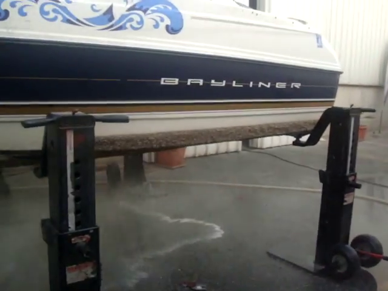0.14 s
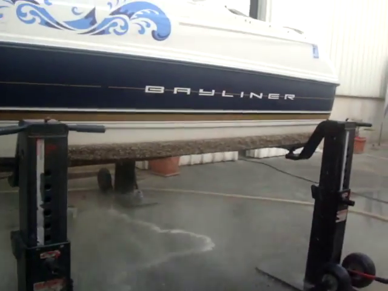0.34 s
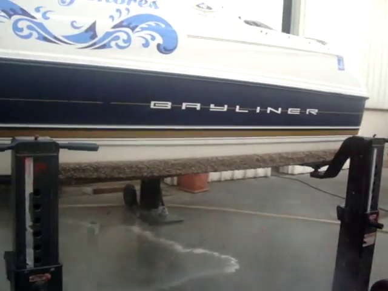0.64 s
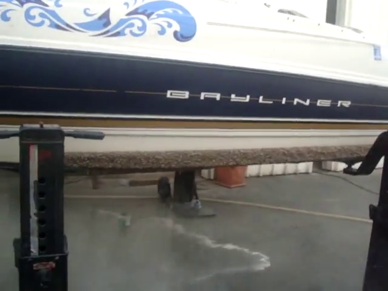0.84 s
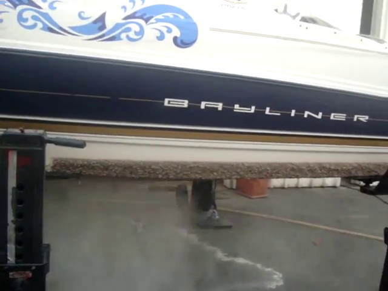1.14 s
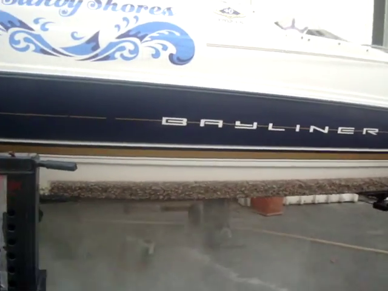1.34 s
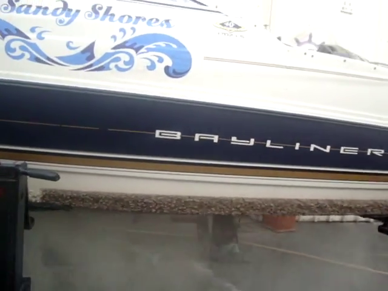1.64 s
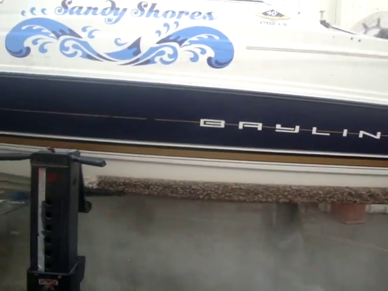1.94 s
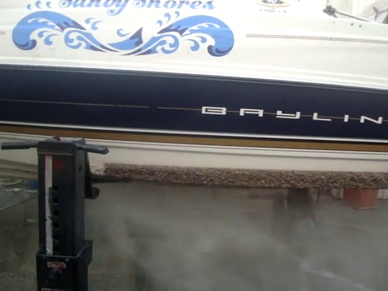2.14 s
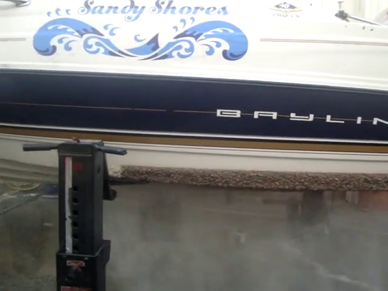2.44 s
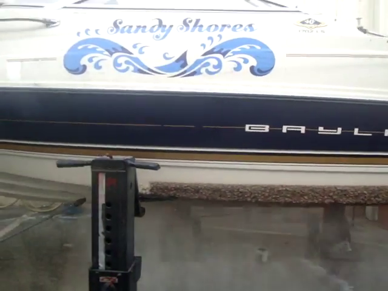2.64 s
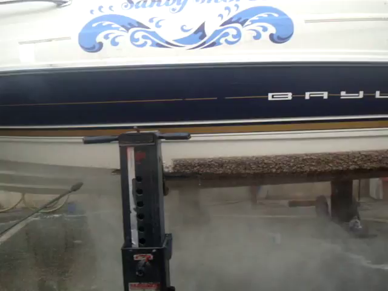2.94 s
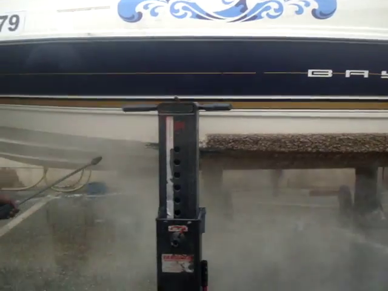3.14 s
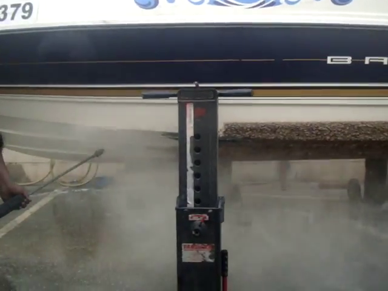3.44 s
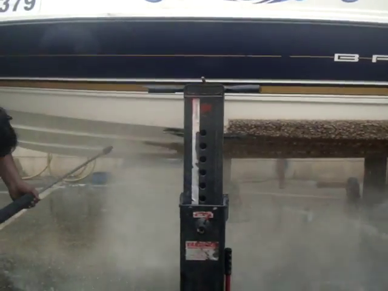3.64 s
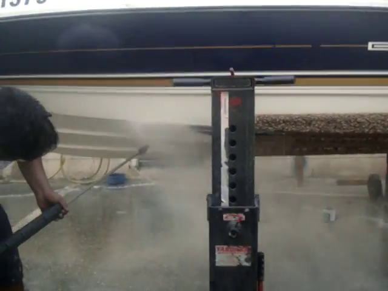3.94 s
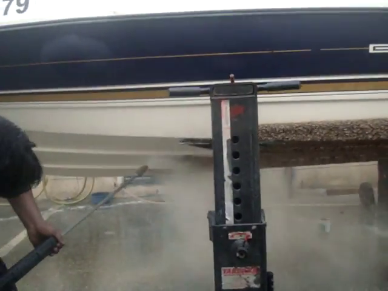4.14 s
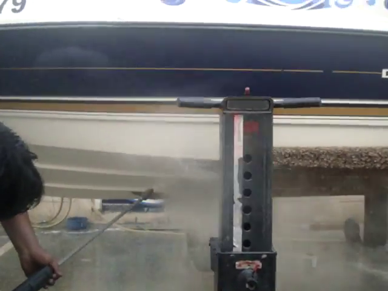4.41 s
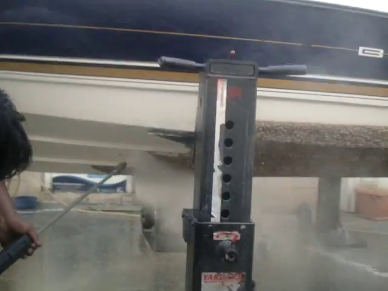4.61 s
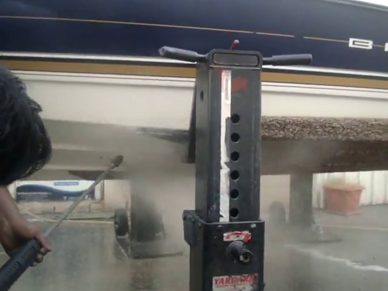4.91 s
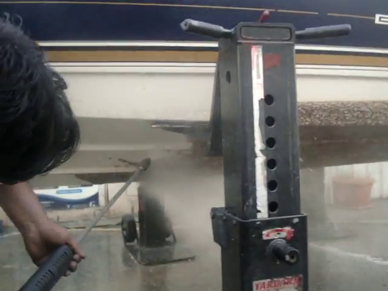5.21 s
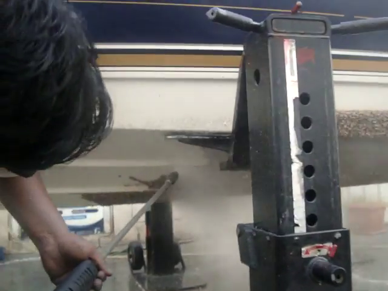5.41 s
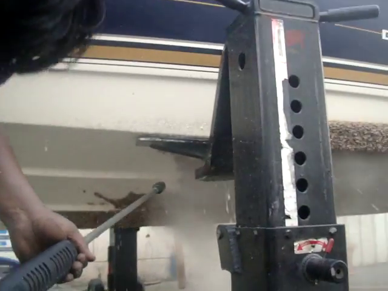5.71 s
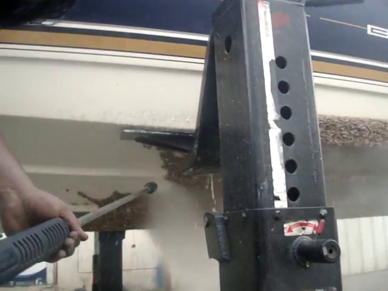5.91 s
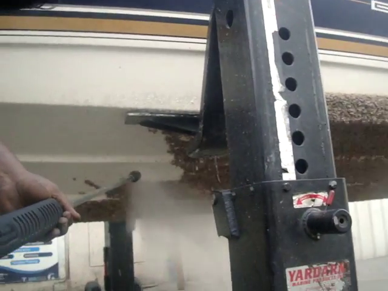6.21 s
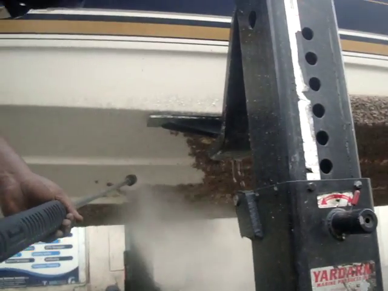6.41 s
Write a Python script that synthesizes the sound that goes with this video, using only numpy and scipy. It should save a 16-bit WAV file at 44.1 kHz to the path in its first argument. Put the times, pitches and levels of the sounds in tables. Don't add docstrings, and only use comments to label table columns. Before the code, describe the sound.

Close, bass-light spray roars on a boat's underside with a raspy motor-like drone, swelling early, later rougher and hollower before thinning at the end.

```python
import sys
import numpy as np
from scipy import signal
from scipy.fft import rfft, irfft, next_fast_len
from scipy.io import wavfile
from scipy.ndimage import uniform_filter1d, map_coordinates

SR = 44100
rng = np.random.default_rng(int(sys.argv[2]) if len(sys.argv) > 2 else 0)


def how_loud(loudness_db):
    steps = np.asarray(loudness_db, float) / 20
    return 10 ** steps


def dump(signal):
    limited = np.clip(np.atleast_2d(signal).T, -1, 1)
    pcm = np.round(limited * 32767).astype(np.int16)
    wavfile.write(sys.argv[1], SR, pcm)


N = 289296

# (time [s], spin rate [Hz])
SPIN_RATE = [(0.0, 162.6), (0.38, 167.4), (0.58, 164.7), (1.99, 165.3), (2.03, 163.6), (2.7, 165.6),
             (2.79, 162.1), (3.65, 162.5), (3.84, 164.6), (3.91, 159.7), (3.96, 162.8), (4.26, 160.1),
             (4.38, 162.8), (5.48, 161.7), (5.97, 164.2), (6.19, 161.8), (6.52, 164.3), (6.56, 166)]
# (time [s], drumming level [dB], ring against roar [dB])
DRUMMING = [(0, -25.5, -4.5), (.4, -27, -14), (.55, -32.5, -3.5), (.85, -33, -6), (1.1, -29.5, -3),
            (1.3, -28.5, -6), (1.7, -19, -4.5), (1.95, -20.5, -6), (2.35, -17.5, -10.5), (2.65, -19.5, -7),
            (2.95, -31, -1.5), (3.5, -27, -4), (3.9, -24.5, -7.5), (4.7, -34, -4), (5, -29, -3),
            (5.2, -33.5, -3), (6.22, -34.5, -8), (6.45, -28.5, -6.5)]
# (multiple of spin [1], level [dB], flutter [dB], phase smear [rad])
HULL_RING = [(1, -32.5, .9, .36), (2, -13, 1.8, .4), (3, -13, 2.2, .4), (4, -9.5, 2, .3),
             (5, -10.5, 1.2, .35), (6, -11, 1.8, .4), (7, -8, 1.6, .45)]
# (multiple of spin [1], level [dB])
HULL_BUZZ = [(8, -5), (9, -7), (10, -7), (11, -7), (12, -6), (13, -7.5), (14, -7.5), (15, -8), (16, -8),
             (17, -9), (18, -7), (19, -10), (20, -11), (22, -12), (24, -13)]
# (middle [s], length [s], multiple of spin [1], level [dB])
HULL_RESONANCES = [(0.063, 0.093, 3, -38.5), (0.34, 0.41, 2, -41.5), (0.303, 0.28, 4, -65), (1.13, 0.14, 4, -43),
                   (1.27, 0.29, 4, -46), (1.343, 1, 2, -42), (1.746, 0.067, 4, -30), (1.823, 0.62, 4, -31.5),
                   (2.142, 0.15, 3, -31.5), (2.255, 1.7, 1, -54.5), (2.042, 0.4, 3, -32.5), (2.27, 0.11, 4, -28),
                   (2.492, 0.51, 3, -29), (2.572, 0.038, 4, -29.5), (2.695, 0.97, 4, -42), (2.943, 0.23, 3, -37.5),
                   (3.315, 0.57, 1, -46), (3.16, 0.29, 4, -37), (3.547, 0.56, 4, -35), (3.53, 0.19, 4, -35),
                   (3.66, 0.24, 3, -36), (2.55, 0.45, 2, -40), (3.866, 0.43, 2, -37.5), (3.91, 0.11, 4, -32),
                   (3.955, 0.24, 3, -33.5), (3.973, 0.72, 1, -51.5), (4, 0.09, 4, -29), (4.204, 0.46, 3, -42),
                   (4.468, 0.27, 4, -47.5), (4.536, 1, 2, -41.5), (4.683, 1.3, 3, -38.5), (4.983, 0.32, 4, -47),
                   (5.3, 1.7, 1, -59.5), (4.968, 0.29, 3, -44), (5.25, 0.28, 4, -54), (5.422, 0.29, 3, -32.5),
                   (5.594, 1.17, 2, -40), (5.656, 0.16, 4, -48), (5.82, 0.63, 4, -40.5), (5.872, 0.76, 3, -39.5),
                   (6.321, 0.34, 1, -51), (.1, .26, 1, -58), (.55, 0.21, 1, -73), (1.1, .4, 1, -72),
                   (6.56, 0.085, 1, -54), (1.5, .9, 3, -45), (2.8, 0.16, 3, -45), (3.25, 0.095, 4, -44),
                   (2.05, 0.18, 4, -34.5),
                   (0.054, 0.11, 7, -37.5), (0.077, .16, 12, -40), (0.316, 0.4, 5, -43), (1.0, 0.28, 5, -47),
              (1.202, 0.76, 5, -35), (1.41, 0.25, 7, -38), (1.47, 0.14, 5, -36), (1.483, 0.084, 12, -41),
              (1.455, 0.08, 8, -30), (1.446, 0.18, 6, -35.5), (1.755, 0.48, 6, -33.5),
              (1.742, 0.34, 5, -23.5), (1.787, 0.14, 7, -31.5), (2.23, 0.44, 7, -28), (2.243, 0.46, 8, -35),
              (2.328, 0.93, 5, -31), (2.358, 0.11, 9, -32), (2.383, 0.087, 7, -31.5),
              (2.66, 0.17, 7, -33.5), (2.806, 0.16, 6, -37), (2.76, 0.11, 10, -36), (2.97, 0.28, 5, -39.5),
              (2.998, 1, 7, -52), (3.064, 0.12, 8, -35.5), (3.068, 0.14, 7, -42), (3.307, 0.4, 8, -42),
              (3.42, .3, 10, -43), (3.46, 0.2, 7, -38), (3.95, 0.095, 8, -40.5), (4.33, .16, 5, -39),
              (4.36, 0.21, 6, -37), (4.574, 0.07, 12, -40), (4.677, 0.1, 11, -38), (4.942, 0.21, 11, -46),
              (4.967, 0.16, 5, -42.5), (4.98, 0.15, 7, -36), (5.0, 0.17, 10, -38.5), (4.97, 0.22, 8, -47),
              (5.175, 0.047, 11, -31), (5.4, 0.11, 6, -39.5), (5.5, 0.11, 8, -42), (5.658, 0.13, 7, -42),
              (5.687, .3, 10, -43.5), (5.722, 0.31, 5, -37.5), (5.778, 0.17, 11, -46), (5.8, 0.48, 7, -41),
              (5.79, 0.2, 12, -40), (5.95, 0.14, 6, -41.5), (6.448, 0.24, 7, -43),
                   (1.76, 0.43, 12, -38.5), (1.745, 0.089, 11, -32.5), (2.6, 0.5, 10, -41.5),
                  (3.4, 0.19, 10, -38), (3.95, 0.2, 10, -37), (6.45, 0.22, 10, -39), (4.02, 0.13, 7, -36),
                  (3.15, .35, 7, -49), (2.75, 0.052, 13, -34.5), (.75, .35, 2, -52), (0.71, .2, 9, -43),
                  (5.95, .3, 1, -60), (.3, 0.09, 5, -44)]
# (middle [s], length [s], multiple of spin [1], share lost [0-1])
HULL_NODES = [(1.38, 0.27, 1, .95), (6.6, .3, 1, .85), (5.37, .1, 1, .8), (0.66, .1, 2, .8),
              (3.2, .14, 2, 0.9), (3.8, .12, 2, 0.6), (5.3, 0.15, 2, 1), (3.95, 0.076, 2, 0.6),
              (5, 0.14, 2, 1), (4.2, 0.071, 2, .7), (5.12, 0.099, 2, 1), (6.1, 0.15, 2, 0.9),
              (2.23, 0.073, 3, 1), (4.22, 0.054, 3, 1), (4.7, 0.099, 3, .7), (3.8, 0.24, 4, 0.8),
              (3.2, 0.067, 4, 0), (1.8, .14, 5, 0.7), (1.9, 0.18, 6, .7), (1.6, .2, 6, 0.7),
              (4.8, 0.2, 5, .6), (1.97, 0.16, 8, .7), (1.3, 0.16, 8, 0.8), (3.1, 0.17, 11, .7),
              (3.3, 0.26, 12, 0.8), (8.5, .25, 9, .7), (5.95, .2, 11, .7), (1.8, .1, 10, .7)]
# (middle [s], length [s], gain [dB])
LANCE_SURGES = [(0.1, .15, 1), (.3, 0.13, -0.5), (1.512, 0.15, 1), (1.745, 0.21, 1), (1.895, .1, 1),
                (2.107, 0.11, 2), (2.237, 0.063, -0.5), (2.375, .15, 1), (2.505, 0.11, -2),
                (2.6, 0.036, 1.5), (2.702, .08, 1.5), (2.809, 0.044, 3.5), (3.146, 0.15, 0.5),
                (3.56, 0.083, 1), (4.502, .14, 2.5), (5.302, .16, 1.5), (6.1, 0.31, 3)]
# (time [s], level [dB], fineness [dB], spatter against splash [dB])
SPRAY_STATE = [(0, -25, 0, -0.5), (.4, -24.5, 0, -1.5), (.55, -26.5, 2.5, 2), (1.1, -27, 0.5, -1),
               (1.35, -29, -1.5, 5), (1.75, -23.5, -3.5, -4), (2, -23, -3.5, 1.5), (2.4, -22, -5.5, -2),
               (2.55, -27, 0.5, -0.5), (2.7, -26, -3.5, -4), (2.9, -27, -1, 0), (3.5, -27.5, -1.5, -2),
               (3.6, -24.5, -2.5, 0), (4.1, -21.5, -4, 1.5), (4.9, -24.5, -3.5, 0), (5.3, -24, -3.5, -1),
               (6.25, -28, 1, 0), (6.55, -33.5, 6, -7)]
# (time [s], level against the roar [dB])
HOLLOW_LEVEL = [(0, -18.5), (.8, -18), (1.3, -19), (1.8, -17), (2.5, -13.5), (3.2, -12.5), (3.7, -12.5),
                (4.4, -9.5), (5, -9), (5.5, -8), (6.1, -7.5), (6.56, -13)]
# (time [s], slap against splash [dB], once-a-turn swell [0-1], push against spit [0-2])
CRUST_STATE = [(0, -14, .13, 1), (.95, -13.5, .15, 1), (1.75, -11, .1, 1.4), (2.3, -15, .05, 1),
               (2.9, -10, .25, 1), (3.25, -11, .14, 1), (3.6, -10, .28, .7), (4.1, -14, .1, .5),
               (4.4, -9, .3, .7), (4.8, -11, .28, .7), (5.3, -10, .29, .9), (5.6, -7.5, .18, 2),
               (5.85, -7, .2, 2), (6.1, -8, .3, .8), (6.56, -7, .48, .5)]
# (middle [s], length [s], level over the steady air [dB])
SPRAY_PUFFS = [(.7, 0.28, -2), (1.42, 0.2, -4), (1.65, 0.23, -2.5), (2.55, 0.96, -1), (3.05, 0.7, 0.5),
               (3.86, 0.34, 12), (4.15, 0.37, 8.5), (4.605, .5, 7), (5.35, 0.43, 10.5), (5.803, 0.81, 5),
               (6.296, .3, 6)]
# (middle [s], length [s], multiple of shaft rate [1], level [dB])
PUMP_HUM = [(.15, .4, 3, -69), (1.3, .9, 3, -62.5), (3.1, .3, 3, -61), (4.65, 1.5, 3, -59),
            (5.6, .5, 3, -63), (.7, 1.6, 4, -64), (1.8, .5, 4, -56), (0.55, 2.2, 5, -72),
            (1.85, 1.2, 5, -56), (2.7, 1.1, 5, -63), (1.7, 0.65, 15, -39.5), (2.55, 0.45, 15, -37)]

# (frequency [Hz], density [dB per Hz])
BELLY_SPECTRUM = [(250, -43), (370, -9.5), (450, 2), (580, 0.5), (680, -9), (900, -43)]
# (frequency [Hz], density [dB per Hz])
ROAR_SPECTRUM = [(150, -50), (330, -37.5), (450, -17), (580, -4.5), (700, 1), (1200, 0.5), (1900, -3.5),
                 (3200, -20.5), (8000, -42)]
# (frequency [Hz], density [dB per Hz])
SPLASH_SPECTRUM = [(600, -85), (1300, -17), (1900, -7.5), (2800, -5), (3700, -9), (6000, -23)]
# (frequency [Hz], density [dB per Hz])
SPATTER_SPECTRUM = [(1500, -43), (2800, -16), (3600, -6.5), (4800, -5.5), (6000, -7.5), (9000, -18.5)]
# (frequency [Hz], density [dB per Hz])
MIST_SPECTRUM = [(3000, -49), (5000, -2), (6200, 1.5), (8000, 4), (9300, 3.5), (10300, -2)]
# (frequency [Hz], density [dB per Hz])
SLAP_SPECTRUM = [(300, -50), (800, -12), (1600, -2), (3000, 0), (4500, -4), (6500, -11), (10300, -15)]
# (frequency [Hz], density [dB per Hz])
RUMBLE_SPECTRUM = [(15, -22), (30, -9), (60, -5.5), (100, -2), (140, -1), (200, 5), (400, -51)]
# (frequency [Hz], density [dB per Hz])
DRAUGHT_SPECTRUM = [(80, -44), (150, -5.5), (200, -10.5), (290, 5.5), (420, 6), (600, -1), (1200, -49)]

SPIN_JITTER_HZ = .9
BUZZ_DB, BUZZ_PER_SLAP = -4.3, .5
ROAR_DB, ROAR_GROWS = -3, 0.8
SPLASH_DB, SPATTER_DB, MIST_DB = -2, -3, 3
RUMBLE_DB, DRAUGHT_DB = -63, -48
RUMBLE_GROWS, DRAUGHT_GROWS = 1, 0.68
PUMP_HZ = 47.8
TOP_HZ = 10150


def unit(x):
    return x / np.sqrt(np.mean(x ** 2) + 1e-20)


def curves(rows):
    s, *cols = np.transpose(rows)
    return [np.interp(np.arange(N) / SR, s, c) for c in cols]


def wobble(rate):
    knots = rng.standard_normal(int(N * rate / SR) + 4)
    return map_coordinates(knots, [np.arange(N) * rate / SR])


def hump(middle_s, length_s):
    return np.cos(np.pi * np.clip((np.arange(N) / SR - middle_s) / length_s, -.5, .5))


def coloured(x, spectrum):
    m = next_fast_len(N + 8192)
    f, db = np.transpose(spectrum)
    gain = how_loud(np.interp(np.log(np.fft.rfftfreq(m, 1 / SR) + 1), np.log(f), db))
    return unit(irfft(rfft(x, m) * gain, m)[:N])


def patchy(patchy_db):
    z = signal.stft(rng.standard_normal(N + 512), nperseg=512)[2]
    field = uniform_filter1d(rng.standard_normal(z.shape), 8, 0)
    field = uniform_filter1d(field, 8, 1)
    return signal.istft(z * how_loud(patchy_db * unit(field)), nperseg=512)[1][:N]


def spin():
    rate_hz = uniform_filter1d(curves(SPIN_RATE)[0], size=SR // 8)
    return np.cumsum(rate_hz + SPIN_JITTER_HZ * wobble(22)) / SR


def surge_db():
    return sum(db * hump(s, length) ** 2 for s, length, db in LANCE_SURGES)


def crossings(order):
    return sum(how_loud(db) * np.abs(hump(s, length)) ** 0.59
               for s, length, k, db in HULL_RESONANCES if round(k) == round(order))


def nodes(order):
    lost = sum(share * hump(s, length) ** 2
               for s, length, k, share in HULL_NODES if round(k) == round(order))
    return np.clip(1 - lost * np.ones(N), 0, 1)


def partial(turns, order, flutter_db, smear, drift=1.1):
    phase = 2 * np.pi * order * turns + smear * wobble(25) + drift * wobble(1.97)
    flicker = .7 * wobble(16) + min(order / 5, .8) * wobble(42)
    return np.sqrt(2) * nodes(order) * how_loud(flutter_db * flicker) * np.cos(phase)


def hull(turns):
    drum_db = sum(curves(DRUMMING))
    spray_db, slap_db = curves(SPRAY_STATE)[0], curves(CRUST_STATE)[0]
    buzz_db = 0.73 * drum_db + 0.31 * (spray_db - 9) + BUZZ_DB + BUZZ_PER_SLAP * (slap_db + 10)
    total = np.zeros(N)
    for k, db, flutter_db, smear in HULL_RING:
        level = how_loud(drum_db + db) + crossings(k)
        total += level * partial(turns, round(k), flutter_db, smear)
    for k, db in HULL_BUZZ:
        level = how_loud(buzz_db + db + .8 * wobble(4)) + crossings(k)
        total += level * partial(turns, k, flutter_db=1.6, smear=.35, drift=1.2)
    return how_loud(surge_db()) * total


def spray(turns):
    swell = curves(CRUST_STATE)[1]
    beat = np.exp(swell * (np.cos(2 * np.pi * turns) + .4 * np.cos(4 * np.pi * turns)))
    drum_db = curves(DRUMMING)[0]
    spray_db, fine_db, spatter_db = curves(SPRAY_STATE)
    surge = surge_db()
    mean_db = drum_db.mean()
    roar_db = mean_db + ROAR_GROWS * (drum_db - mean_db) + ROAR_DB + surge
    ranges = [
        (roar_db + curves(HOLLOW_LEVEL)[0], BELLY_SPECTRUM, .8),
        (roar_db, ROAR_SPECTRUM, .8),
        (spray_db + SPLASH_DB - spatter_db / 2, SPLASH_SPECTRUM, 1.1),
        (spray_db + 0.34 * surge + SPATTER_DB + spatter_db / 2, SPATTER_SPECTRUM, 1),
        (spray_db + MIST_DB + fine_db, MIST_SPECTRUM, 1.15)]
    total = np.zeros(N)
    for db, spectrum, depth in ranges:
        water = unit(beat ** depth * coloured(patchy(patchy_db=.6), spectrum))
        total += how_loud(db + .35 * wobble(7) + .27 * wobble(35)) * water
    return total


def slaps(turns):
    slap_db, _, push_share = curves(CRUST_STATE)
    nearest = np.round(turns)
    chance = rng.standard_normal((int(turns[-1]) + 2, 2))
    size_db, late = chance[nearest.astype(int)].T
    off = turns - nearest + 0.011 * late
    push = push_share * np.exp(-(off / .009) ** 2)
    spit = np.exp(-(off / .03) ** 2) * rng.standard_normal(N)
    hits = how_loud(1.9 * np.clip(size_db, -3, 2)) * (push + spit)
    return how_loud(curves(SPRAY_STATE)[0] + slap_db - .5) * coloured(hits, SLAP_SPECTRUM)


def yard():
    drum_db = curves(DRUMMING)[0]
    swing_db = drum_db - drum_db.mean()
    puff_db = sum(db * hump(s, length) for s, length, db in SPRAY_PUFFS)
    rumble_db = RUMBLE_DB + RUMBLE_GROWS * swing_db + puff_db + 1.2 * wobble(2.4)
    draught_db = DRAUGHT_DB + DRAUGHT_GROWS * swing_db + 0.54 * puff_db + 1.2 * wobble(5.4)
    rumble = how_loud(rumble_db) * coloured(rng.standard_normal(N), RUMBLE_SPECTRUM)
    draught = how_loud(draught_db) * coloured(rng.standard_normal(N), DRAUGHT_SPECTRUM)
    return rumble + draught


def pump():
    turns = np.cumsum(PUMP_HZ + .25 * wobble(3.01)) / SR
    total = np.zeros(N)
    for s, length, k, db in PUMP_HUM:
        level = np.sqrt(2) * how_loud(db) * np.abs(hump(s, length)) ** .6
        total += level * np.sin(2 * np.pi * round(k) * turns)
    return total


def scene():
    turns = spin()
    shake = 0.099 * wobble(17) + 0.88 * wobble(45)
    jolt = how_loud(shake - uniform_filter1d(shake, size=SR // 14))
    jet = hull(turns) + spray(turns) + slaps(turns)
    return (jolt * jet + yard() + pump())[None]


def starved(x, share, long_share):
    hz, _, z = signal.stft(x, SR, nperseg=296, noverlap=148)
    band = (hz // 520).astype(int)
    hop = np.arange(z.shape[-1])
    need = how_loud(1.5 * wobble(5))[np.minimum(hop * 148, N - 1)]
    draw = rng.random((band[-1] + 1, hop[-1] // 4 + 1))[:, hop // 4] / need
    clustered = np.minimum(draw, 3 * np.roll(draw, 1, axis=0))
    brief = (clustered < share) & (hop % 4 < 2)
    lost = (brief | (draw < long_share))[band] & (hz > 4900)[:, None]
    x = signal.istft(z * np.where(lost, how_loud(-30), 1), SR, nperseg=296, noverlap=148)[1][:, :N]
    return irfft(rfft(x) * (np.fft.rfftfreq(N, 1 / SR) < TOP_HZ), N)


def top_cut(x):
    return signal.sosfilt(signal.butter(12, 11310, fs=SR, output="sos"), x)


def record(dry):
    held = dry / (1 + (dry / .8) ** 4) ** .25
    held = held * (1 - 0.57 * hump(middle_s=0.86, length_s=0.012) ** 2)
    thin = starved(held, share=.21, long_share=.025)
    return top_cut(thin)


dry = scene()
out = record(dry)
dump(out)
```